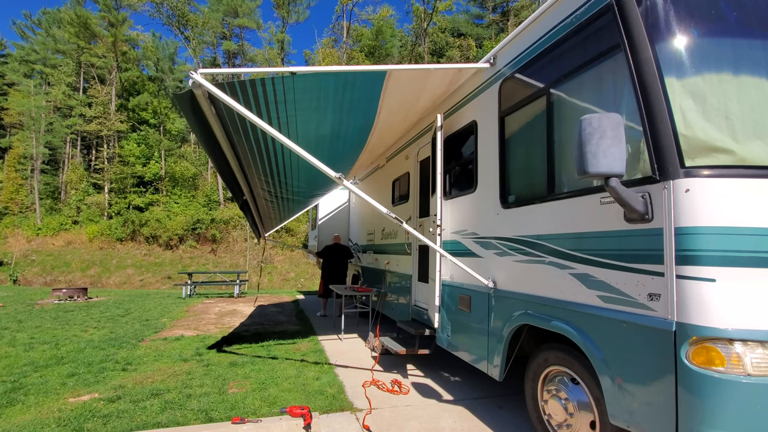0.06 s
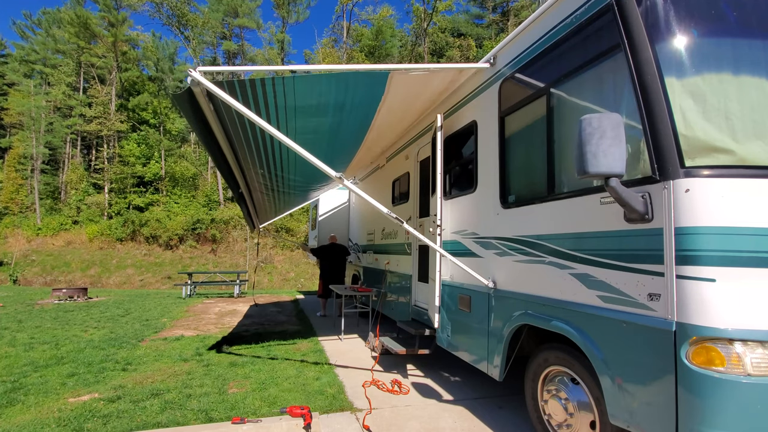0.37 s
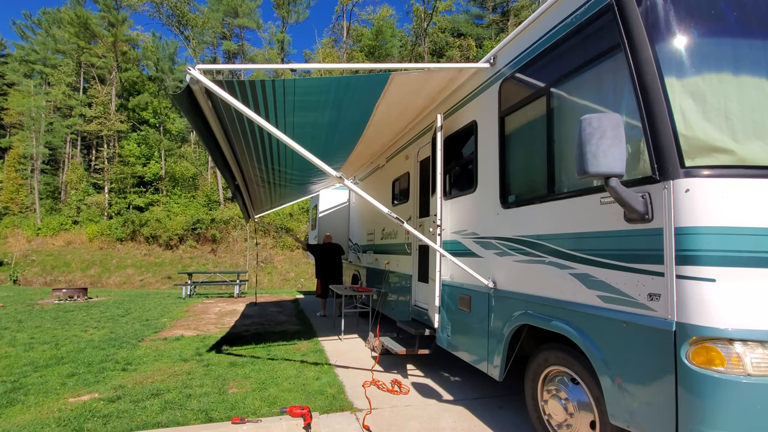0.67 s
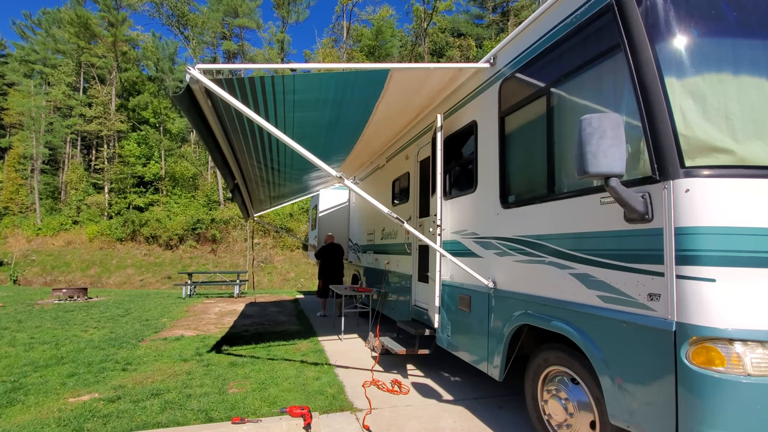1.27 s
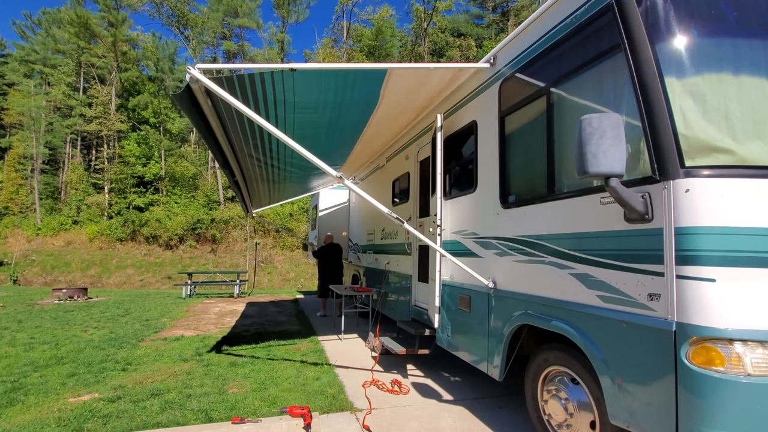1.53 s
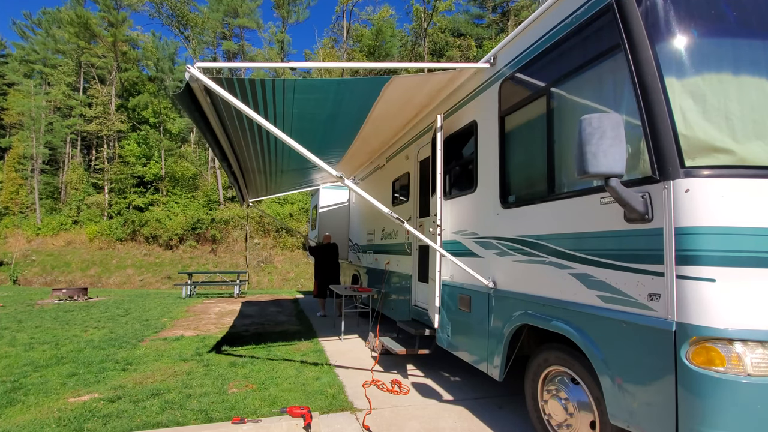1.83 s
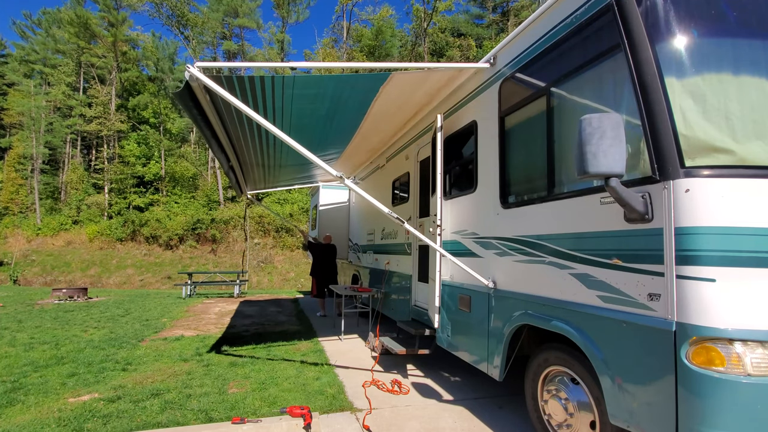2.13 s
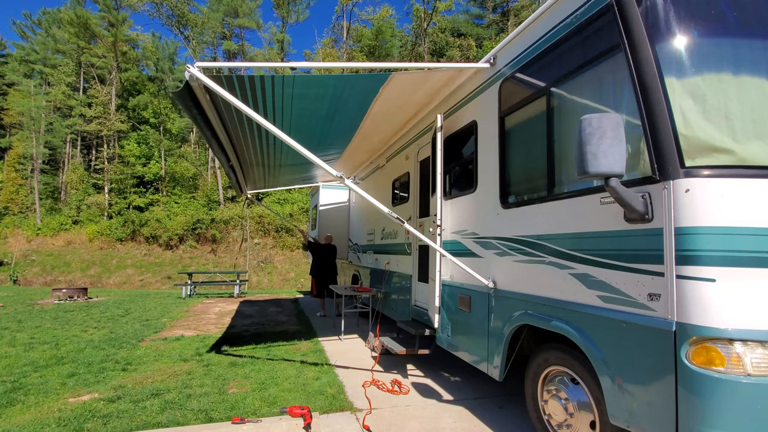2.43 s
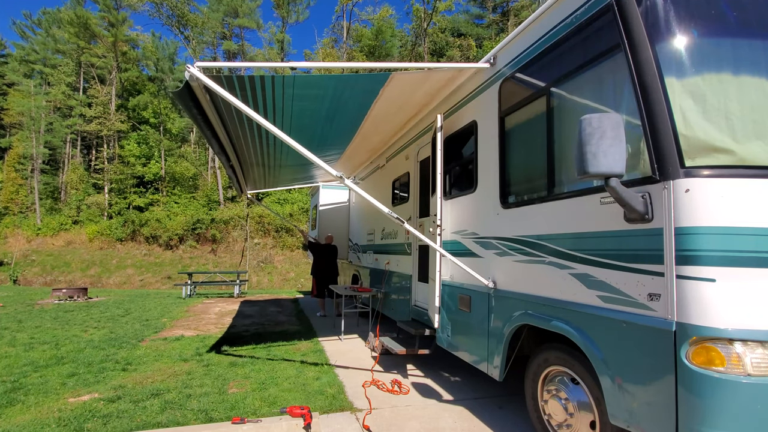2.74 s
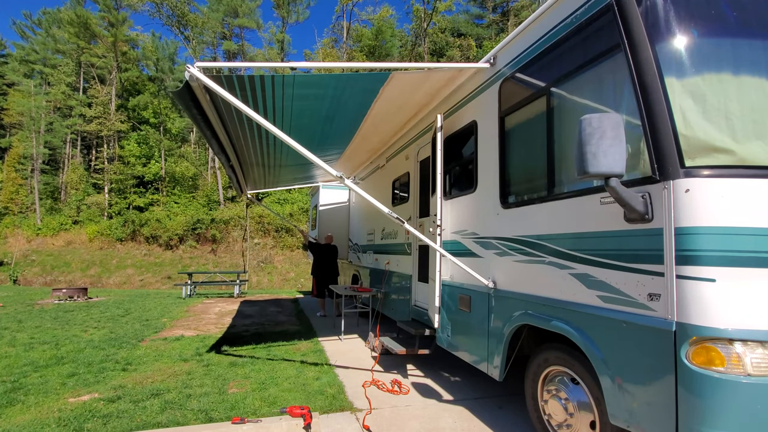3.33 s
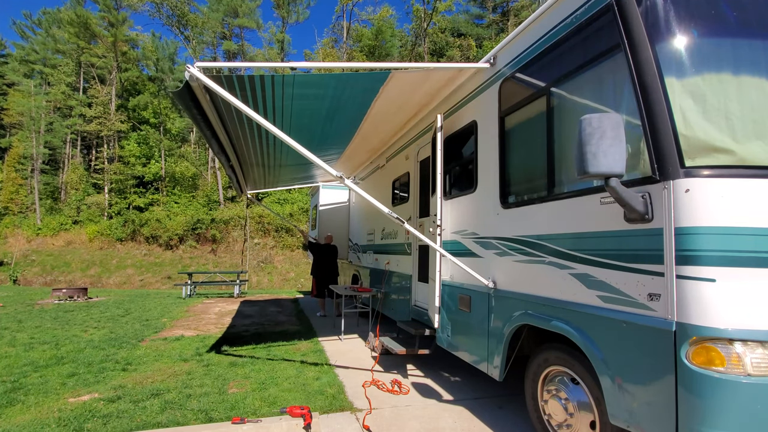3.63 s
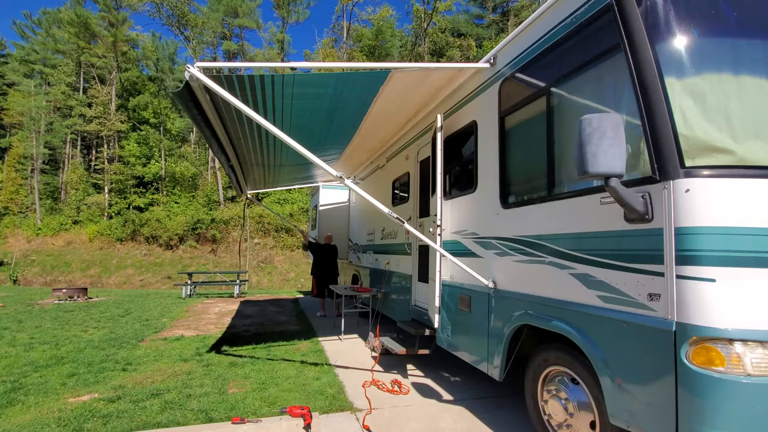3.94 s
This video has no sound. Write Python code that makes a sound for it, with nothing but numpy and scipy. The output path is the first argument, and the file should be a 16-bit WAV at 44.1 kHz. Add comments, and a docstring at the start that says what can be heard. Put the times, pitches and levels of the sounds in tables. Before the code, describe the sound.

An awning's hollow metal arms slide twice, creaking and knocking over the low rumble of fabric. After a few soft taps, the latch snaps shut. Crickets trill faintly around the quiet campsite and light wind buffets the microphone.

```python
"""An awning is pushed up beside a parked motorhome, a little to the right, at a quiet campsite.
Its hollow metal arms slide in two rushing strokes of friction, creak where they bind, knock in
their joints and latch with a ringing clack, while the roller tube and fabric rumble underneath.
Crickets and katydids scrape their wings in the grass; a light breeze rumbles on the microphone."""
import sys
import numpy as np
from scipy import signal
from scipy.fft import rfft, irfft
from scipy.io import wavfile
from scipy.ndimage import map_coordinates

SR = 44100
rng = np.random.default_rng(int(sys.argv[2]) if len(sys.argv) > 2 else 0)


def master(y):
    """Save y as 16-bit WAV."""
    cut = np.clip(np.atleast_2d(y).T, -1, 1)
    pcm = np.round(cut * 32767)  # scale
    wavfile.write(sys.argv[1], SR, pcm.astype(np.int16))


N = 176400
T = np.arange(N) / SR
HZ = np.maximum(np.fft.rfftfreq(N, 1 / SR), 1)
HIT_SAMPLES = SR // 2

# The colour of sliding metal. Each row: frequency in Hz, relative level in dB.
RUSH_COLOUR = [(100, 15), (300, -5), (450, -6.5), (650, -4), (950, -1.5), (1400, -2.5), (1950, -1),
               (2600, -3), (4500, -8.5), (7000, -10.5), (10000, -14), (15500, -16)]
# Where the awning sits between the ears. Each row: frequency in Hz, left over right in dB.
AWNING_PLACE = [(200, -2), (700, -5.5), (1400, -10), (2400, -11.5), (4600, -16.5), (7500, -11),
                (10000, -2.5), (15000, -4.5)]


def from_db(db):
    """Decibels to gain."""
    return 10 ** (np.asarray(db) / 20)


def rms_one(x):
    """Scale to rms 1."""
    return x / np.sqrt(np.mean(x ** 2) + 1e-20)


def over_hz(points):
    """Spread a table over the spectrum, on a log-frequency axis."""
    hz, value = np.transpose(points)
    return np.interp(np.log(HZ), np.log(hz), value)


def level_curve(rows):
    """A gain envelope through (seconds, dB) points, silent outside their span."""
    return from_db(np.interp(T, *np.transpose(rows), left=-200, right=-200))


def drift(rate_hz):
    """A random wander of rms 1, mostly slower than rate_hz."""
    return rms_one(irfft(rfft(rng.standard_normal(N)) / (1 + (HZ / rate_hz) ** 2), N))


def panned(pan_db):
    """Left and right gains of constant power; positive is left."""
    gains = from_db(np.array([[.5], [-.5]]) * pan_db)
    return gains / np.sqrt(np.mean(gains ** 2, axis=0))


def noise(colour, pan_db, likeness):
    """Stereo noise of a given colour, place and left-right likeness; rms 1."""
    mid, side = rfft(rng.standard_normal((2, N)))
    stereo = np.sqrt(1 + likeness) * mid + np.sqrt(1 - likeness) * side * [[1], [-1]]
    return rms_one(irfft(colour * panned(pan_db) * stereo, N))


def edge(x, hz, kind, order=2):
    """Butterworth low- or high-pass."""
    return signal.sosfilt(signal.butter(order, hz, kind, fs=SR, output="sos"), x + 1e-18)


def add(out, s, sound):
    """Mix a short sound in at s seconds."""
    part = out[:, int(s * SR):][:, :sound.shape[1]]
    part += sound[:, :part.shape[1]]


def at_awning(colour):
    """Noise coming from the awning, more diffuse in the treble."""
    # Each row: frequency in Hz, left-right likeness from 0 to 1.
    likeness = [(300, 0.77), (1400, 0.49), (3000, 0.12), (7000, 0.088)]
    return noise(colour, over_hz(AWNING_PLACE), over_hz(likeness))


def ripple(depth_db=4, spacing_hz=49.61):
    """Uneven gain over frequency from many weak, crowded resonances."""
    places = np.arange(600) * spacing_hz
    return from_db(depth_db * np.interp(HZ, places, rng.standard_normal(len(places))))


def resonate(force, modes):
    """Modes (Hz, relative dB, t60 in seconds) ring under a force, at the force's own power."""
    out = 0
    for hz, db, t60 in modes:
        radius, angle = from_db(-60 / (t60 * SR)), 2 * np.pi * hz / SR
        ring = signal.lfilter([1, 0, -radius], [1, -2 * radius * np.cos(angle), radius ** 2], force)
        out = out + from_db(db) * rms_one(ring)
    return rms_one(out) * force.std()


def still_air():
    """A faint bed of still air and far woods."""
    # Each row: frequency in Hz, relative level in dB.
    colour = [(30, 3.5), (100, -4.5), (190, -2.5), (300, -16), (500, -26), (1000, -27), (2200, -30.5),
              (5000, -30.5), (10500, -40.5), (15500, -35.5)]
    # Each row: frequency in Hz, left over right in dB.
    place = [(100, -7.5), (350, -6), (1200, -0.5), (4500, -6.5), (11000, 0.5)]
    return from_db(-64) * noise(from_db(over_hz(colour)), over_hz(place), likeness=.13)


def breeze():
    """Gusts buffet the two microphone ports unevenly, making a lumpy rumble."""
    # Each row: time in seconds, relative level in dB, left over right in dB.
    gusts = [(0.0, -42.5, -26), (0.14, -47.5, 9), (0.17, -35, 17), (0.24, -38, 2), (0.33, -51, 20),
             (0.38, -40, -25), (0.47, -67, 0), (0.5, -45.5, 22), (0.701, -47, -8.5), (0.732, -37, 16),
             (0.8, -53.5, -5), (1.07, -43.5, 2), (1.11, -46.5, 30), (1.21, -42.5, -10), (1.29, -60.5, 7),
             (1.671, -39, 8), (1.75, -67, 4), (1.9, -57, -9.5), (2.29, -54, 2), (2.37, -67, -15),
             (2.65, -62.5, 9), (3.01, -53.5, -2.5), (3.06, -43.5, -5), (3.168, -39, 18), (3.238, -56, -40),
             (3.32, -58, 23), (3.41, -46, -14), (3.54, -43, -23), (3.579, -58, -8), (3.88, -57.5, -1.5),
             (4.0, -44, 4.5)]
    # The deep colour of the wind. Each row: frequency in Hz, relative level in dB.
    colour = [(15, -24), (30, -12.5), (45, 4.5), (65, 7), (95, 0), (125, -13), (160, -16.5), (250, -27),
              (400, -38.5), (800, -55), (2000, -74)]
    s, db, pan_db = np.transpose(gusts)
    buffet_db = 3.5 * drift(rate_hz=3)
    gust = from_db(2.5 + np.interp(T, s, db) + buffet_db) * panned(np.interp(T, s, pan_db))
    return gust * noise(from_db(over_hz(colour)), pan_db=0, likeness=.067)


def wing(hz, width_hz, pan_db):
    """A scraped wing resonance: a narrow band of noise."""
    return noise(1 / np.sqrt(1 + (2 * (HZ - hz) / width_hz) ** 4), pan_db, likeness=0)


def pulsing(per_s, depth):
    """Nearly regular wing strokes, as a gain."""
    phase = 2 * np.pi * np.cumsum(per_s * (1 + .07 * drift(rate_hz=1.6))) / SR
    return rms_one(1 + depth * np.sin(phase))


def insect_chorus():
    """Crickets and katydids scrape throughout, each voice gently swelling and sinking."""
    # Each row: pitch in Hz, bandwidth in Hz, pulses per second, pulse depth from 0 to 1,
    # level in dB, left over right in dB.
    voices = [(8325, 300, 11, 0.1, -76, -3.5), (7430, 550, 34, 0, -70.5, -52),
              (6510, 1130, 78, 0.23, -73.5, -26), (8310, 710, 42, 0.24, -72, -6),
              (3926, 360, 25, 0, -80.5, -17)]
    out = 0
    for hz, width_hz, per_s, depth, db, pan_db in voices:
        song = wing(hz, width_hz, pan_db) * pulsing(per_s, depth)
        out = out + song * from_db(db + .9 * drift(rate_hz=4))
    return out


def near_cricket(hz=3690, width_hz=450, pan_db=-20.5, attack_s=.13, release_s=.055):
    """A nearer cricket starts and stops, with a clear, wavering note inside its wing scrape."""
    # Each row: start and end in seconds, relative level in dB, pulses per second.
    trills = [(0.865, 1.22, -71.5, 43), (3.182, 3.52, -72.5, 36), (3.503, 4.1, -77, 25.1)]
    effort = 0
    for start, end, db, per_s in trills:
        rise = np.clip((T - start) / attack_s, 0, 1)
        fall = np.exp(-np.maximum(T - end, 0) / release_s)
        effort = effort + from_db(db) * rise * fall * pulsing(per_s, depth=.58)
    pitch_hz = hz * (1 + .00973 * drift(rate_hz=74))
    note = rms_one(np.sin(2 * np.pi * np.cumsum(pitch_hz) / SR))
    return effort * (wing(hz, width_hz, pan_db) + from_db(-1) * panned(pan_db) * note)


def roller():
    """Low rumble of the roller tube and the fabric as they are lifted."""
    # Each row: frequency in Hz, relative level in dB.
    colour = [(50, -29.5), (95, 5), (130, -10), (200, -6), (330, -16.5), (480, -26), (1200, -47)]
    # The rumble swells twice. Each row: time in seconds, level in dB.
    swells = [(0, -62.5), (.2, -54), (.45, -56.5), (1.0, -67), (1.35, -56), (2.05, -58.5), (2.2, -60),
              (2.45, -71.5)]
    return level_curve(swells) * at_awning(from_db(over_hz(colour)))


def creaks(slips_per_s=55, slip_fall_db=14, t60_s=.014):
    """Where an arm binds it sticks and slips unevenly, and each slip sets one resonance ringing."""
    # Each row: middle in seconds, half length in seconds, pitch in Hz, level in dB.
    binds = [(0.534, 0.036, 2230, -57), (0.804, 0.07, 1960, -73.5), (1.547, 0.04, 1780, -58.5),
             (1.67, 0.048, 1320, -52.5), (1.86, 0.11, 1520, -53), (2.143, 0.036, 1800, -65)]
    slip_phase = np.cumsum(slips_per_s * (1 + .3 * drift(slips_per_s))) / SR % 1
    force = at_awning(from_db(over_hz(RUSH_COLOUR))) * from_db(-slip_fall_db * slip_phase)
    out = 0
    for s, half_s, hz, db in binds:
        ring = rms_one(resonate(edge(force, hz / 2, "high"), [(hz, 0, t60_s)]))
        out = out + from_db(db) * np.exp(-((T - s) / half_s) ** 2) * ring
    return out


def ratchet(t60_s=.12):
    """The ratchet ticks in thin, bright bursts of noise."""
    # Each row: start in seconds, relative level in dB.
    ticks = [(0.682, -52.5), (1.744, -57), (2.268, -65)]
    bright = edge(at_awning(1), 4500, "high", order=1)
    out = np.zeros((2, N))
    for s, db in ticks:
        decay = from_db(db - 60 * T[:HIT_SAMPLES] / t60_s)
        add(out, s, bright[:, int(s * SR):][:, :HIT_SAMPLES] * decay)
    return out


def blow(contact, tail, s, db, length_s, treble_hz, bass_hz):
    """Metal strikes metal: a short burst of contact noise, then a dull tail."""
    attack_s, fade_db_per_s, contact_t60_s, tail_t60_s = .003, 105, .08, .2
    t, span = T[:HIT_SAMPLES], slice(int(s * SR), int(s * SR) + HIT_SAMPLES)
    envelope = np.minimum(t / attack_s, 1) * from_db(-fade_db_per_s * np.minimum(t, length_s))
    after = np.maximum(t - length_s, 0)
    strike = contact[:, span] * from_db(-60 * after / contact_t60_s)
    body = tail[:, span] * from_db(-60 * after / tail_t60_s)
    hit = edge(envelope * (strike + body), treble_hz, "low", order=3)
    return from_db(db) * edge(hit, bass_hz, "high")


def joint_knocks(colour, tail, t60_s=.02):
    """Each joint knocks with a rattle of uneven contacts and a resonance of its own."""
    # Each row: start in seconds, relative level in dB, rattle length in seconds, treble edge in Hz,
    # bass edge in Hz, resonance in Hz, its level against the hit in dB.
    knocks = [(0.181, -36, 0.022, 5600, 90, 346, -11.5), (0.678, -52, 0.078, 8400, 600, 1480, -5.5),
              (1.183, -51, 0.031, 1830, 1080, 1650, -5), (1.255, -56, 0.035, 1570, 583, 1040, -8),
              (1.311, -43.5, 0.016, 1550, 280, 1525, -8.5), (1.746, -46.5, 0.0096, 3530, 297, 910, -5),
              (2.263, -60, 0.044, 10200, 660, 1420, -5), (2.553, -61, 0.039, 1600, 198, 295, 3.5),
              (2.923, -61, 0.029, 2660, 600, 850, -2.5), (2.99, -68.5, 0.015, 1410, 700, 980, 1)]
    rattle = rms_one(at_awning(colour) * from_db(3 * drift(rate_hz=260)))
    out = np.zeros((2, N))
    for s, *shape, ring_hz, ring_db in knocks:
        hit = blow(rattle, tail, s, *shape)
        add(out, s, hit + from_db(ring_db) * resonate(hit, [(ring_hz, 0, t60_s)]))
    return out


def latch(colour, tail, bass_hz=660, tube_hz=1720, tube_db=-53, tube_t60_s=.44):
    """The latch snaps in brightly, seats with a duller blow and leaves one long note in the tube."""
    # Each row: start in seconds, relative level in dB, contact length in seconds, treble edge in Hz.
    blows = [(3.313, -37, 0.02, 10300), (3.329, -41.5, 0.0068, 4200)]
    # The ring of the latch. Each row: pitch in Hz, relative level in dB, t60 in seconds.
    modes = [(970, -8, 0.045), (1755, 8, 0.13), (1900, 12, 0.058), (2976, 4, 0.091), (3610, 11, 0.069),
             (3680, 10, 0.15)]
    contact, clack, t = at_awning(colour), np.zeros((2, N)), T[:HIT_SAMPLES]
    for s, *shape in blows:
        add(clack, s, blow(contact, tail, s, *shape, bass_hz))
    clack = edge(clack, bass_hz, "high", order=1)   # a small part: little bass
    out = clack + from_db(-9) * resonate(clack, modes)
    note = np.sin(2 * np.pi * tube_hz * t) * from_db(tube_db - 60 * t / tube_t60_s)
    pan_db = np.interp(tube_hz, *np.transpose(AWNING_PLACE))
    add(out, blows[0][0], panned(pan_db) * note)
    return out


def impacts():
    """Joints and latch strike with the same metal colour and the same dull tail."""
    # The colour of a knock. Each row: frequency in Hz, relative level in dB.
    struck_metal = [(115, 11), (200, 4), (340, 3.5), (550, -6), (1000, 1), (1750, -2), (2500, -3.5),
                    (3500, -4.5), (5500, -6), (8000, -8.5), (10000, -13.5), (15500, -14.5)]
    colour = from_db(over_hz(struck_metal)) * ripple()
    tail = from_db(-3) * edge(at_awning(colour), 3200, "low", order=1)
    return joint_knocks(colour, tail) + latch(colour, tail)


def sliding_arms(sag_per_s=.03, dull_hz=2690, treble_growth=.17, full_treble_db=-66):
    """Friction noise follows the speed, brightens with it and rings in the lengthening arms."""
    # The speed of the push, one list a stroke. Each row: time in seconds, relative level in dB.
    strokes = [
        [(0, -60.5), (.09, -57.5), (.13, -52), (.3, -50.5), (.52, -53), (.68, -55.5), (.8, -62.5), (.92, -82)],
        [(1.39, -72), (1.48, -61.5), (1.55, -55), (1.67, -53), (1.92, -52), (2.06, -56), (2.18, -61),
         (2.27, -75), (2.36, -78)],
    ]
    # The ring of the hollow arms. Each row: pitch in Hz, relative level in dB, t60 in seconds.
    modes = [(348, -4, 0.11), (921.5, 0.5, 0.13), (1117, -4.5, 0.14), (1229, 0, 0.18), (1290, 0, 0.7),
             (1499, 7, 0.072), (1697, 3.5, 0.15), (1792, 6.5, 0.03), (1957, 7.5, 0.14), (2970, 4, 0.022)]
    colour = from_db(over_hz(RUSH_COLOUR))
    rush = from_db(.5) * at_awning(colour * ripple())
    ring = from_db(-8) * resonate(at_awning(colour), modes)
    grain = from_db(drift(rate_hz=41.8))   # 1 dB of roughness
    out = 0
    for stroke in strokes:
        speed, middle = level_curve(stroke), (stroke[0][0] + stroke[-1][0]) / 2
        # Read ever more slowly, so all resonances sink as the arm lengthens.
        read_s = T - sag_per_s * ((T - middle) ** 2 - middle ** 2) / 2
        sinking = [map_coordinates(side, [read_s * SR], order=3, mode="wrap") for side in rush + ring]
        rub = grain * np.array(sinking)
        dull = edge(rub, dull_hz, "low", order=1)
        brightness = (speed / from_db(full_treble_db)) ** treble_growth
        out = out + speed * (dull + brightness * (rub - dull))
    return out


def scene():
    """The awning over the air and insects of the campsite."""
    campsite = still_air() + breeze() + insect_chorus() + near_cricket()
    return campsite + roller() + creaks() + ratchet() + impacts() + sliding_arms()


def record(dry):
    """The top is cut steeply above 15.7 kHz."""
    return signal.sosfilt(signal.ellip(12, .1, 70, 15700, fs=SR, output="sos"), dry)


dry = scene()
out = record(dry)
master(out)
```